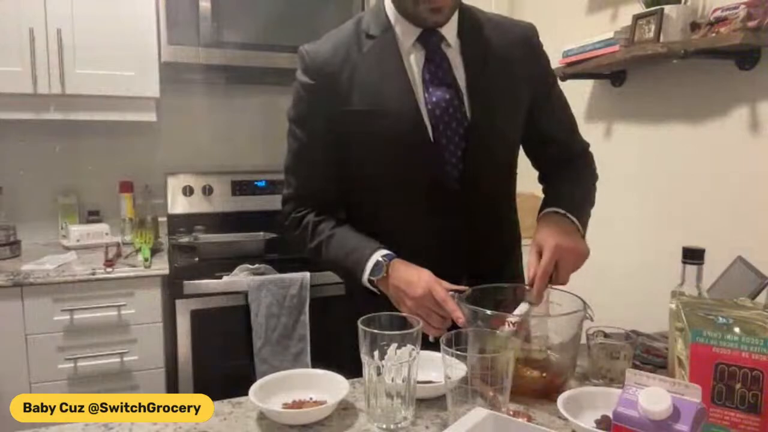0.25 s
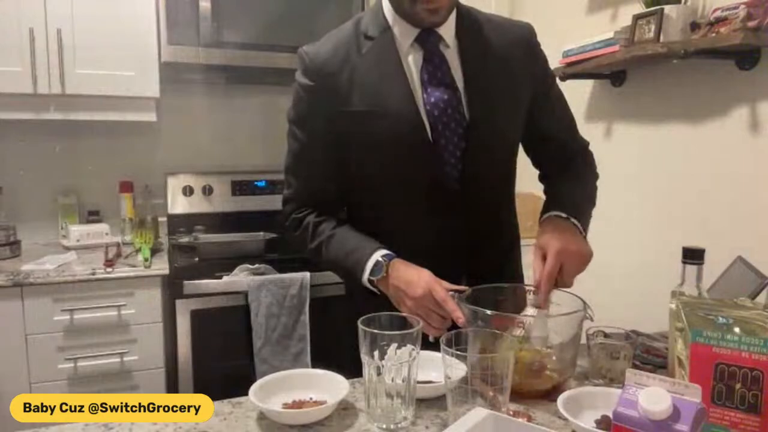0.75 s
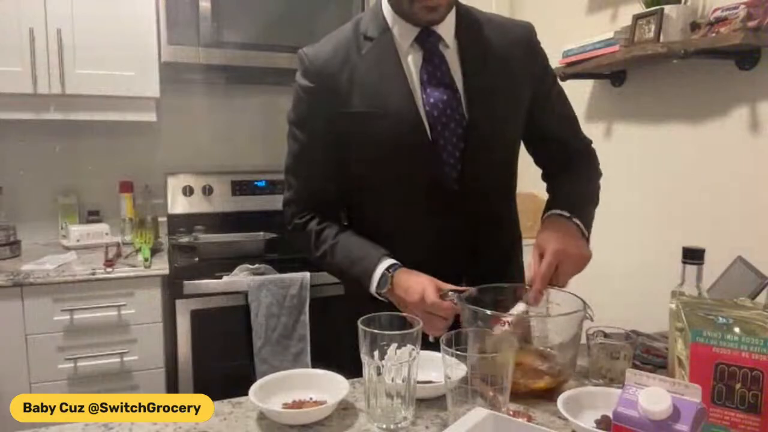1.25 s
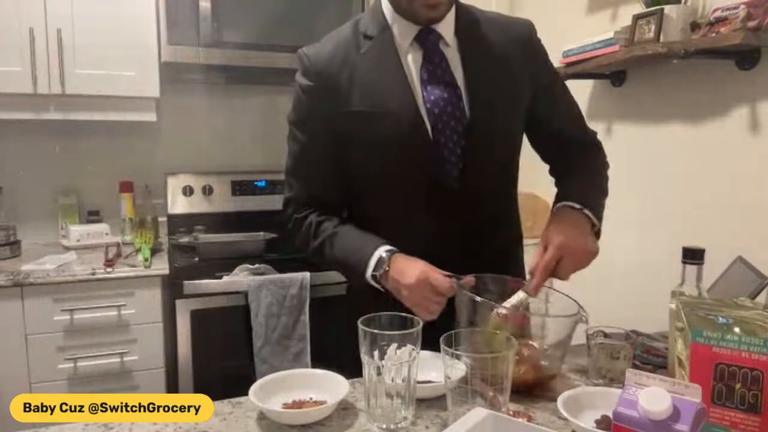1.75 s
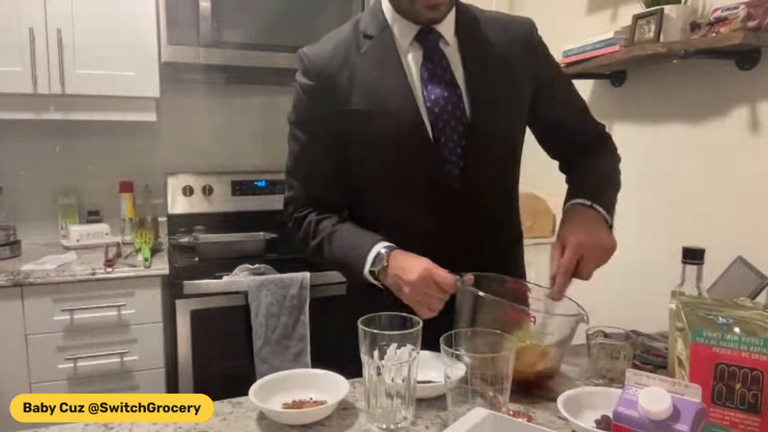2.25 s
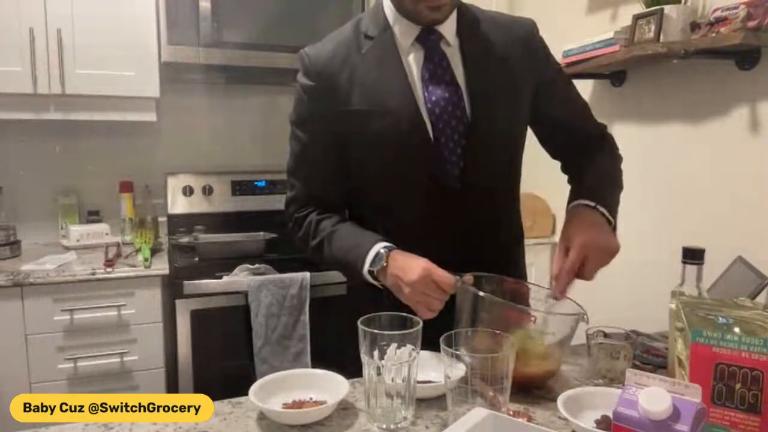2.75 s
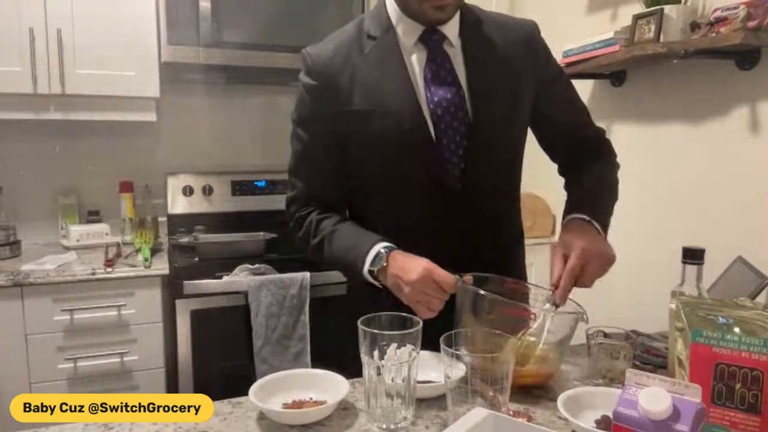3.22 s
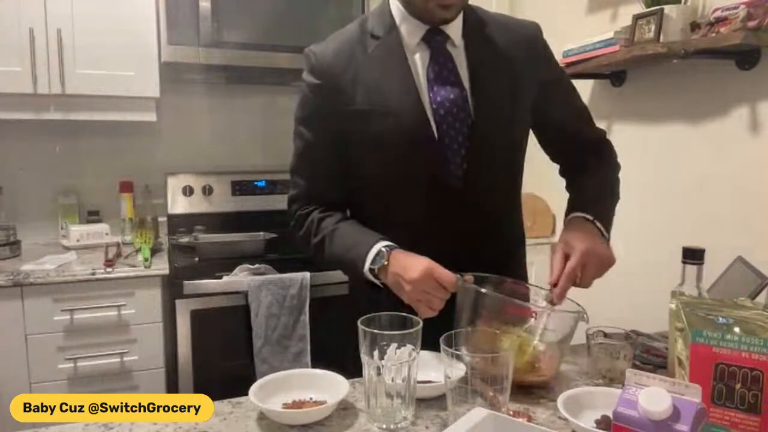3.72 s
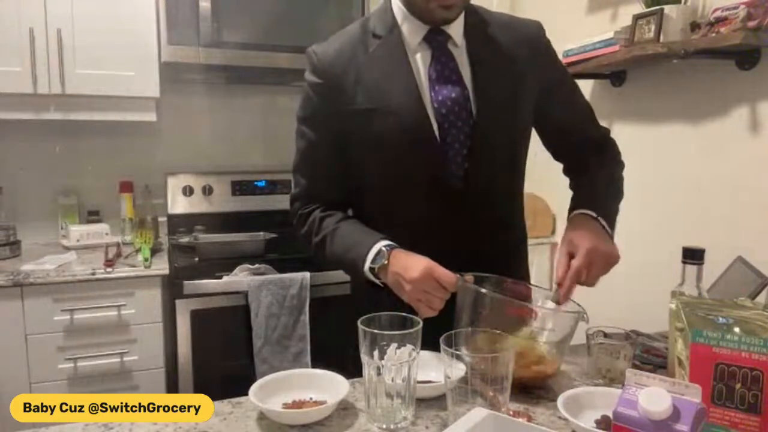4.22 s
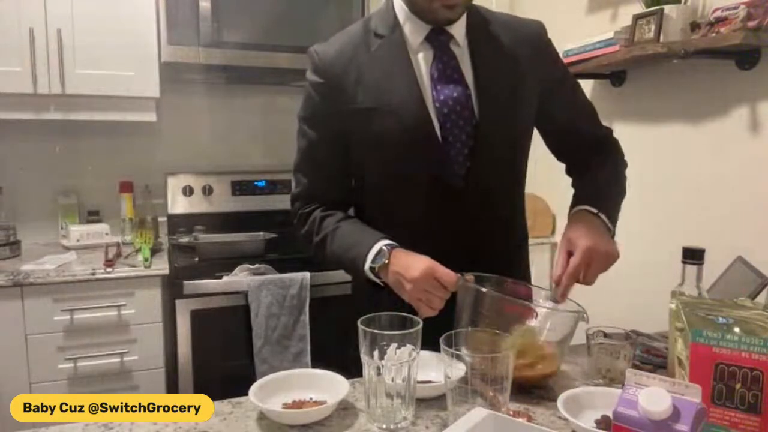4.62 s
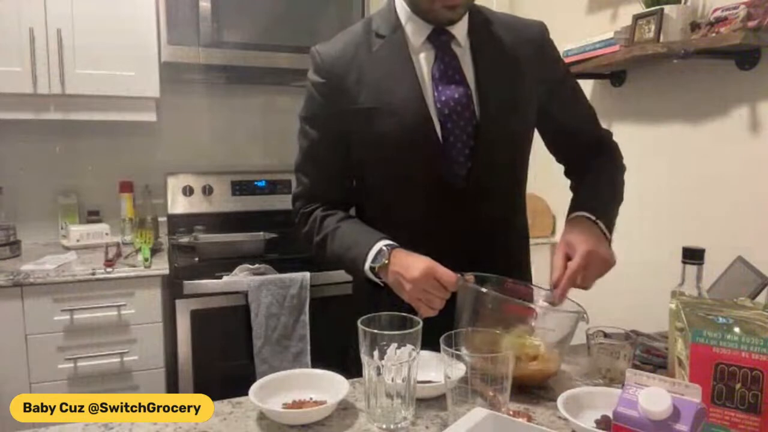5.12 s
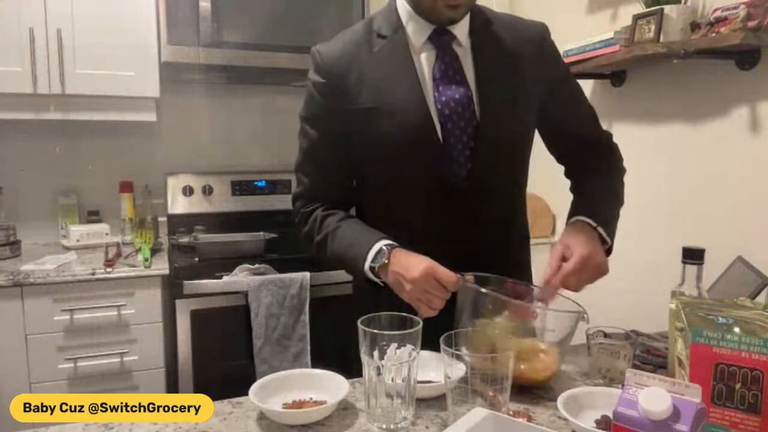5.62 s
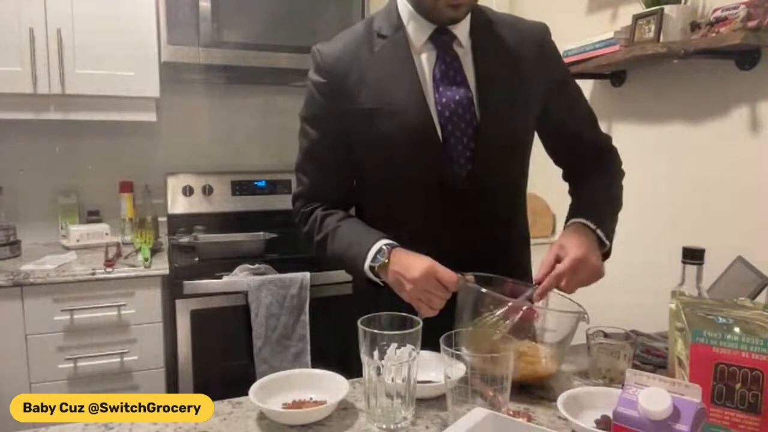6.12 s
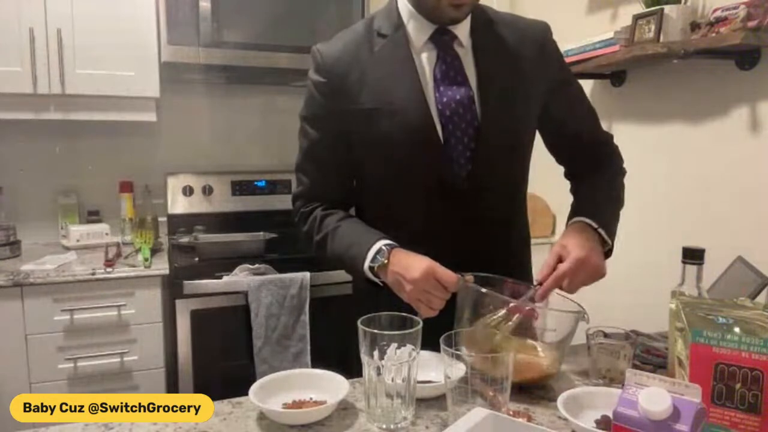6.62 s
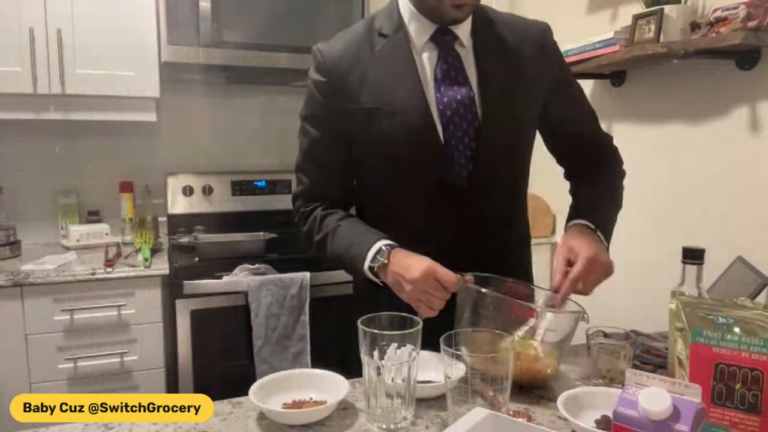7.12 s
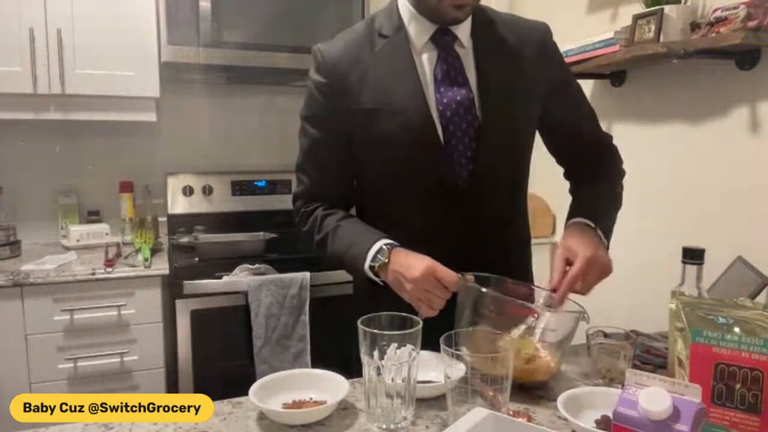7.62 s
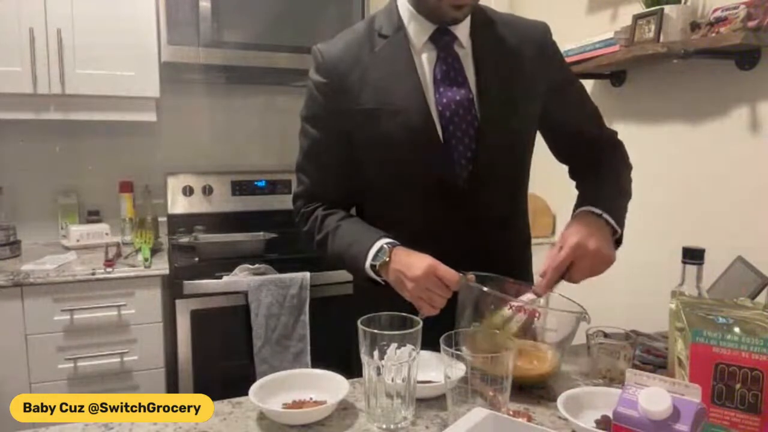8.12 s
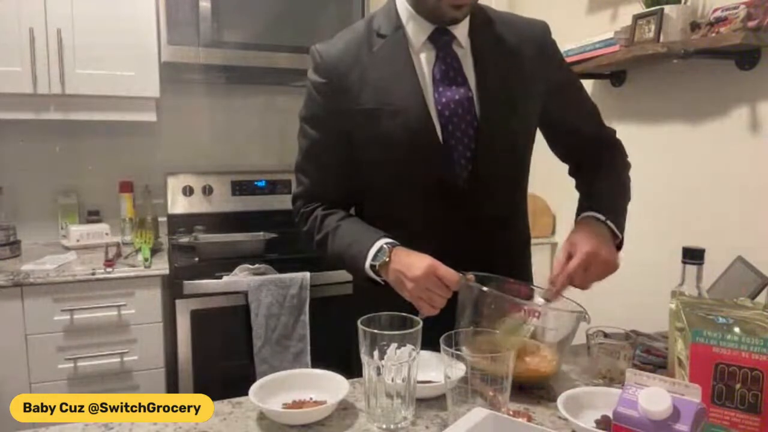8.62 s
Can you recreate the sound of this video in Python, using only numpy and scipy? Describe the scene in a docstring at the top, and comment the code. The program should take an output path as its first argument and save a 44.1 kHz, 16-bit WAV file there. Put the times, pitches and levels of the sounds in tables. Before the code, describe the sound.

A wire whisk beats thin batter in a glass bowl on a kitchen counter, heard very close, with a short hard-room echo and faint steady hiss. Soft squelches begin at once, about six a second, made of crackly slosh, fine fizz and tiny ringing bubbles; a sharper splashy stroke comes at 0.75. Strokes grow stronger from 1.5 to 2.3, with a hollow knock at 1.7 and a clack with wire twang at 1.85. The loudest knock, hollow and glassy, lands at 2.65. Softer stirring follows, a dull knock at 3.5 and a clearer one at 4.35, after which the pace slows slightly. Air pockets plop with rising pitch throughout, and brief airy whistles squeeze out near 5.35 and 6.5. Bright strokes hit around 6.3 to 6.5 with a twang. Thudding knocks at 7.55 and a glassy one at 8.65 precede the end near 8.9, still whisking.

```python
"""Soft wet squelches come first, over faint hiss: a wire whisk in thin batter, five or six strokes a second.
The listening point is close to a glass bowl on a counter in a small hard kitchen, which answers with a short echo.
Strokes are bursts of clicks and small ringing bubbles; trapped air plops as decaying tones of rising pitch.
Air whistles as resonant noise; now and then the whisk knocks the bowl: a hollow note, damped glass modes,
a wire clack and a counter thud, and single wires twang as beating tones."""
import sys
import numpy as np
from scipy import signal
from scipy.fft import rfft, irfft, next_fast_len
from scipy.io import wavfile
from scipy.ndimage import map_coordinates

SR = 44100
rng = np.random.default_rng(int(sys.argv[2]) if len(sys.argv) > 2 else 0)


def bounce(signal):
    """Save signal as a 16-bit WAV file at the path given by the first command-line argument."""
    frames = np.transpose(np.atleast_2d(signal))
    limited = np.clip(frames, -1, 1)
    pcm = np.round(limited * 32767).astype(np.int16)
    wavfile.write(sys.argv[1], SR, pcm)


N = 390726


def amp(db):
    """Decibels to gain."""
    return 10 ** (np.asarray(db) / 20)


def unit(x):
    """x at rms 1."""
    return x / np.sqrt(np.mean(x ** 2) + 1e-20)


def along(points, hz):
    """(Hz, value) points read on a log frequency axis."""
    f, v = np.transpose(points)
    return np.interp(np.log(hz + 1), np.log(f), v)


def filtered(x, response):
    """x times a response of frequency."""
    m = next_fast_len(len(x) + 4096)
    return irfft(rfft(x, m) * response(np.fft.rfftfreq(m, 1 / SR)), m)[:len(x)]


def coloured(x, spectrum):
    """x given a spectrum, at rms 1."""
    return unit(filtered(x, lambda hz: amp(along(spectrum, hz))))


def add(track, s, sound):
    """Mix a sound into the track from second s on."""
    i = max(round(s * SR), 0)
    track[i:i + len(sound)] += sound[:len(track[i:])]


def fade(t, t60):
    """Gain of a decay that loses 60 dB in t60 seconds."""
    return np.exp(-np.log(1000) * t / np.maximum(t60, 1e-4))


def crackle(size, rate, spread_db):
    """Tiny films bursting: about rate clicks a second, of uneven strength and either sign, at rms 1."""
    present = rng.random(size) < rate / SR
    sign = rng.choice([-1, 1], size)
    strength = amp(spread_db * np.clip(rng.standard_normal(size), -2, 2))
    return unit(present * sign * strength)


def bubble(t, hz, t60, glide, onset_cycles):
    """A ringing air pocket: a decaying sine whose pitch climbs (glide > 0) as it nears the surface."""
    pitch = hz * (1 + glide * (np.minimum(t / t60, 1) - 1 / 4))
    tone = np.sin(2 * np.pi * np.cumsum(pitch, axis=-1) / SR)
    onset = 1 - np.exp(-(t * hz / onset_cycles) ** 2)
    return tone * fade(t, t60) * onset


def froth(size, when, hz, gain, cycles):
    """Many small bubbles, each a damped sine that loses 60 dB in some cycles, at rms 1."""
    k = np.arange(SR // 70)
    t, hz = k / SR, np.minimum(hz, SR / 3)[:, None]
    onset = 1 - np.exp(-t * hz / 2)
    pops = gain[:, None] * np.sin(2 * np.pi * hz * t) * fade(t, cycles / hz) * onset
    at = (when * SR).astype(int)[:, None] + k
    return unit(np.bincount(at.ravel(), pops.ravel(), size)[:size])


def gurgling(x, depth_db):
    """The hollows between wires and batter keep changing shape, so resonances come and go."""
    z = signal.stft(x, nperseg=256)[2]
    row, column = np.indices(z.shape)
    place = [7 * np.log1p(row / 7), column / 5]  # broader patches toward the treble
    field = map_coordinates(rng.standard_normal((32, z.shape[1] // 5 + 2)), place, order=1)
    gain = amp(depth_db * np.clip(field, -1.5, 1.5))
    return unit(signal.istft(z * gain, nperseg=256)[1][:len(x)])


def ring(t, modes):
    """A struck object's modes as decaying sines, neighbours swinging in opposite directions."""
    return sum((-1) ** k * amp(db) * np.sin(2 * np.pi * hz * t) * fade(t, t60)
               for k, (hz, db, t60) in enumerate(modes))


# colour of the room's steady air: f/Hz, relative level/dB
AIR_COLOUR = [(20, -12), (50, -14), (85, -0.5), (130, 6), (200, 4), (400, -2), (800, -14.5), (2000, -12.5),
              (6000, -23.5), (11500, -28), (12500, -39), (16000, -41)]


def room_air():
    """The steady faint hiss of the room: coloured noise."""
    return amp(-60) * coloured(rng.standard_normal(N), AIR_COLOUR)


# how long the small hard kitchen rings: f/Hz, t60/s
KITCHEN_DECAY = [(100, 0.23), (300, 0.73), (700, 0.23), (2000, 0.36), (5000, 0.19), (9000, 0.27),
                 (15000, 0.43)]


def kitchen(x, count=24):
    """Counter, wall and cupboards answer as decaying noise; the pattern changes as the bowl moves."""
    out, t = np.zeros(N), np.arange(SR // 2) / SR
    nearby = 1 + 1.1 * np.exp(-((t - .02) / .022) ** 2)  # the first reflections are the strongest
    for part in np.array_split(np.arange(N), count):
        hz, when, z = signal.stft(rng.standard_normal(len(t)), SR, nperseg=256)
        decay = fade(when, along(KITCHEN_DECAY, hz)[:, None])
        tail = signal.istft(z * decay, SR, nperseg=256)[1][:len(t)]
        tail = tail * nearby * (1 - np.exp(-(t / 0.00093) ** 2))
        add(out, part[0] / SR, signal.fftconvolve(x[part], tail / np.linalg.norm(tail)))
    return out


# how hard the batter is stirred: t/s, relative level/dB
STIRRING = [(0, -59), (.3, -66.5), (.6, -57.5), (2.8, -52), (3.8, -57), (4.9, -54), (7.5, -55),
            (8.86, -57.5)]


def effort_db(s):
    """Relative level of the stirring at second s, which moves slosh, light strokes and wake pockets."""
    return np.interp(s, *np.transpose(STIRRING))


# the arm slows halfway: t/s, stroke rate/Hz
STROKE_PACE = [(0, 6), (4.25, 6), (4.45, 5.52), (8.86, 5.52)]
FIRST_STROKE_TURNS = .64


def beats():
    """The moments at which the whisk dips in, once every turn of the wrist."""
    now = np.arange(N) / SR
    turns = np.cumsum(np.interp(now, *np.transpose(STROKE_PACE))) / SR
    return np.interp(np.arange(FIRST_STROKE_TURNS, turns[-1]), turns, now)


# strokes that break the surface and stand out:
# t/s, spray relative level/dB, slap relative level/dB, central bubble f/Hz, length scale/s
STRONG_STROKES = [(0.088, -38.5, -54, 2190, 0.027), (0.226, -40, -42.5, 6630, 0.014),
                  (0.482, -27.5, -40, 4450, 0.014), (0.612, -33, -38, 4820, 0.014),
                  (0.7637, -21, -40, 4200, 0.0058), (.809, -36.5, -34, 6150, .006),
                  (0.967, -40, -37.5, 3320, 0.024), (1.109, -35.5, -36, 2160, 0.017),
                  (1.14, -33.5, -38, 2930, 0.018), (1.48, -28.5, -29, 6400, 0.0055),
                  (1.806, -23, -29.5, 4340, 0.013), (1.953, -29, -30.5, 6160, 0.016),
                  (2.11, -31, -25.5, 2360, .026), (2.274, -24, -22.5, 4860, 0.004),
                  (2.936, -38.5, -51, 4330, 0.051), (3.105, -37, -39.5, 4440, 0.021),
                  (3.45, -44, -44, 11050, 0.028), (3.647, -20.5, -32, 6800, 0.011),
                  (3.944, -34, -40, 4140, 0.0048), (4.279, -40.5, -42, 2380, 0.024),
                  (4.667, -35.5, -67, 4710, 0.025), (4.833, -38.5, -42, 3500, 0.027),
                  (5.024, -37.5, -36.5, 3810, 0.022), (5.379, -25, -33, 4100, 0.0044),
                  (5.749, -38, -30.5, 3380, .01), (5.941, -33.5, -35, 2540, 0.0059),
                  (6.11, -38, -25.5, 3870, 0.01), (6.227, -32.5, -48, 2065, .007),
                  (6.3, -20, -27, 8330, 0.0095), (6.48, -24, -30.5, 2200, 0.0096),
                  (7.172, -31, -38, 6110, 0.015), (7.347, -38, -37, 5120, .03),
                  (7.694, -33, -48, 4320, .012), (8.071, -34.5, -45.5, 2840, 0.0073),
                  (8.446, -21.5, -27.5, 6670, .004), (8.639, -42, -25, 3500, 0.0081),
                  (8.807, -34, -31, 8730, 0.013)]
LIGHT_DB, LIGHT_HZ, LIGHT_S = 5.5, 3713, 0.034  # an ordinary stroke: spray re effort, bubble pitch, length
LIGHT_SCATTER_DB, LIGHT_SCATTER_OCT = 1, 0.37  # standard deviations of its level and pitch
LIGHT_SLAP_DB = 1.5  # slap of an ordinary stroke over its spray


def all_strokes():
    """Every beat is a light squelch that follows the effort, unless a strong one takes its place."""
    times, strong = beats(), np.transpose(STRONG_STROKES)[0]
    force, size = rng.standard_normal((len(times), 2)).T
    levels = effort_db(times) + LIGHT_DB + LIGHT_SCATTER_DB * force
    pitches = LIGHT_HZ * 2 ** (LIGHT_SCATTER_OCT * size)
    light = [(s, db, db + LIGHT_SLAP_DB, hz, LIGHT_S) for s, db, hz in zip(times, levels, pitches)]
    return STRONG_STROKES + [row for row in light if np.abs(strong - row[0]).min() > .06]


# colour of the moving batter: f/Hz, relative level/dB
SLOSH_COLOUR = [(250, -27.5), (650, 13.5), (950, -0.5), (1300, 9), (1800, -2), (2600, 0.5), (4200, 4.5),
                (6000, -6), (10000, -23)]
# colour of its fine fizz: f/Hz, relative level/dB
FIZZ_COLOUR = [(1500, -18.5), (3500, -7.5), (5500, 7.5), (8000, 6), (11300, 0.5), (12500, -17),
               (16000, -26)]


def swirl(strokes, count=1500):
    """After each stroke the batter sloshes and fizzes, then settles; stray bubbles pop in it."""
    now = np.arange(N) / SR
    starts = np.sort(np.transpose(strokes)[0])
    since = np.abs(now - starts[np.searchsorted(starts, now) - 1])
    stirred = amp(-4) + np.exp(-since / 0.018) * (1 - np.exp(-since / 0.021))
    lumps = amp(3.5 * map_coordinates(rng.standard_normal(N // 1200), [np.arange(N) / 1400], order=1))
    when, size, strength = rng.random((count, 3)).T
    hz = 900 * 7 ** (size ** 1.326)
    pops = froth(N, when * N / SR, hz, amp(-22 * np.sqrt(strength)), cycles=50)
    slosh = coloured(gurgling(crackle(N, rate=2000, spread_db=4), depth_db=8), SLOSH_COLOUR)
    fizz = coloured(gurgling(crackle(N, rate=4000, spread_db=4), depth_db=6), FIZZ_COLOUR)
    batter = amp(-2.5) * slosh + amp(-10) * pops + amp(-7) * stirred * fizz
    return amp(effort_db(now)) * stirred * lumps * batter


# batter sucked through the wires with a whistling edge:
# t/s, relative level/dB, f/Hz, length scale/s
WHISTLING_GAPS = [(0, -48, 2690, 0.056), (0.089, -35.5, 10540, 0.0095), (0.453, -48.5, 2190, .06),
                  (0.932, -50.5, 5760, 0.023), (4.596, -32.5, 7360, 0.0067), (5.264, -43, 2600, 0.013),
                  (5.348, -27.5, 4090, .007), (6.48, -28.5, 1163, 0.015), (7.698, -41, 9200, 0.016),
                  (8.266, -34, 6000, 0.012)]


def slurps():
    """Air drawn through a narrow gap in the batter sings roughly around one pitch: resonant noise."""
    out, t = np.zeros(N), np.arange(SR // 4) / SR
    for s, db, hz, length in WHISTLING_GAPS:
        def gap(f):
            """Two equal resonances in a row, of quality 7."""
            return (1 + 1j * 7 * (f / hz - hz / (f + 1))) ** -2

        swell = (1 - np.exp(-t / 0.00022)) * np.exp(-(t / length) ** 2)
        song = unit(swell * filtered(rng.standard_normal(len(t)), gap))
        add(out, s, amp(db) * np.sqrt(np.mean(swell ** 2)) * song)
    return out


WAKE_S, WAKE_DB, WAKE_HZ = .09, -1.5, 1198  # pocket behind a stroke: mean delay, level re effort, pitch
WAKE_SCATTER_S, WAKE_SCATTER_DB, WAKE_SCATTER_OCT = 0.022, 1, 0.367  # their standard deviations


def wake_pockets():
    """The batter closes behind every stroke and traps a small pocket of air."""
    times = beats()
    pockets = []
    for s, (late, force, size) in zip(times, rng.standard_normal((len(times), 3))):
        when = s + WAKE_S + WAKE_SCATTER_S * late
        level_db = effort_db(s) + WAKE_DB + WAKE_SCATTER_DB * force
        pockets.append((when, level_db, WAKE_HZ * 2 ** (WAKE_SCATTER_OCT * size)))
    return pockets


# large pockets of air closing in the batter: t/s, relative level/dB, f/Hz
AIR_POCKETS = [(0.437, -51, 1405), (0.827, -48.5, 1330), (1.268, -36, 722), (1.32, -39, 677),
               (1.97, -41.5, 1002), (2.275, -34, 608), (2.428, -46, 710), (2.606, -42.5, 680),
               (3.279, -44.5, 1430), (3.986, -40.5, 707), (4.066, -51.5, 1182), (4.293, -45.5, 717),
               (4.456, -33, 666), (4.504, -45, 710), (4.805, -43.5, 672), (4.873, -51, 1600),
               (4.997, -40.5, 913), (5.371, -34.5, 705), (5.944, -48, 742), (6.046, -46, 1224),
               (6.114, -44, 682), (6.36, -43, 738), (6.483, -32, 722), (6.782, -47, 624),
               (6.827, -34.5, 698), (7.366, -43, 700), (8.838, -32, 754)]


def plops(count=6):
    """Air pockets gulp on a rising tone, each with a short wet gurgle of lesser bubbles."""
    out, t = np.zeros(N), np.arange(SR // 8) / SR
    for s, db, hz in AIR_POCKETS + wake_pockets():
        add(out, s - .002, amp(db + 15.5) * bubble(t, hz, 0.053, glide=0.15, onset_cycles=1.86))
        colour = [(hz / 2, -25), (hz, 0), (hz * 2, -5), (hz * 4, -20), (SR / 2, -60)]
        gurgle = coloured(rng.standard_normal(len(t)), colour)
        add(out, s - .006, amp(db) * gurgle * fade(t, 0.1) * (1 - np.exp(-t / 0.013)))
        when, size = rng.random((2, count))
        lesser = froth(len(t), .06 * when, hz * (1 + 0.99 * size), 1.2 - when, cycles=11)
        add(out, s - .012, amp(db - 25) * lesser)
    return out


# whisk wires springing off the glass: t/s, relative level/dB, f/Hz
WIRE_TWANGS = [(1.84, -28.5, 2246), (1.838, -33, 1400), (1.842, -33, 3970), (2.941, -38, 4210),
               (2.977, -44.5, 2600), (6.484, -28.5, 2142), (7.615, -38.5, 3860), (7.698, -43, 4153)]


def twangs():
    """Neighbouring wire loops are nearly alike, so each twang beats as it dies."""
    out, t = np.zeros(N), np.arange(SR // 3) / SR
    for s, db, hz in WIRE_TWANGS:
        loops = ring(t, [(hz, 0, .13), (hz * 1.025, -6, .09), (hz * .97, -8, .07)])
        add(out, s, amp(db) * loops * (1 - np.exp(-t / 0.00024)))
    return out


# the glass, damped by batter and hand: f/Hz, relative level/dB, t60/s
GLASS_MODES = [(1222, -2, .04), (1300, -5.5, 0.044), (1440, -15, 0.025), (1525, -13, 0.066),
               (1666, -7, 0.052), (1843, -12, 0.061), (1990, -29.5, 0.05), (2060, -28.5, 0.045),
               (2500, -9, 0.081), (2760, -12, 0.13), (2826, -11, 0.067), (3670, 1, 0.014),
               (4260, -12.5, 0.0375), (4305, 0, 0.039), (5800, -8, 0.028), (6370, -13, 0.054),
               (5930, -2, 0.029), (7060, -11.5, 0.093), (8390, -8.5, 0.034)]
GLASS_SPLIT, TWIN_DB = 0.027, -2  # relative pitch spread of each mode's twin, its level re the mode


def glass_modes():
    """The handle and the uneven wall split every mode of the glass in two."""
    twins = [(hz * np.exp(GLASS_SPLIT * rng.standard_normal()), db + TWIN_DB, t60)
             for hz, db, t60 in GLASS_MODES]
    return GLASS_MODES + twins


# the counter under the bowl: f/Hz, relative level/dB, t60/s
COUNTER_MODES = [(94, -9, .07), (112.7, -22, 1), (150.5, 8, 0.058), (202, -3, 0.12), (286, 2.5, 0.085),
                 (364, -7.5, 0.076)]
# colour of wires clacking on glass: f/Hz, relative level/dB
CLACK_COLOUR = [(150, -43.5), (330, 0), (600, 4.5), (1400, 2.5), (2400, -9), (3200, -16.5), (4100, -3.5),
                (7000, -13.5), (12000, -3.5), (16000, -13)]
# whisk against the bowl: t/s, hollow note relative level/dB, note f/Hz, glass relative level/dB,
# clack relative level/dB, contact hardness as a low-pass f/Hz, counter thud relative level/dB
BOWL_KNOCKS = [(1.680, -15.5, 523, -25.5, -50, 920, -38.5), (1.839, -25, 469, -30, -11.5, 2490, -64),
               (2.661, -6.5, 616, -8, -8, 4230, -34.5), (3.506, -20, 610, -46, -48, 492, -30),
               (4.192, -51, 614, -60, -53, 600, -47.5), (4.339, -11.5, 639, -32, -18, 1080, -31),
               (7.562, -13.5, 614, -24, -14, 620, -22), (8.670, -12, 626, -17.5, -12.5, 1590, -37)]
RATTLE_DB, RATTLE_T60_S = -17.5, 0.5  # wires skipping on the glass: start level re the blow, decay


def knocks():
    """The bowl gives a short hollow note; only hard contacts reach the high modes of the glass."""
    out, t = np.zeros(N), np.arange(SR * 3 // 4) / SR
    bowl, counter = amp(-1) * ring(t, glass_modes()), ring(t, COUNTER_MODES)
    for s, note_db, note_hz, glass_db, clack_db, hard_hz, thud_db in BOWL_KNOCKS:
        note = bubble(t, note_hz, 0.02, glide=-0.063, onset_cycles=3.45)
        add(out, s, amp(note_db) * note / np.abs(note).max())
        squeezed = bubble(t, note_hz * 1.087, 0.038, glide=0, onset_cycles=3.3)
        add(out, s - .008, amp(note_db - 9.5) * squeezed)  # batter squeezed out first
        rattle_on = fade(t, 0.028) + amp(-20.5) * fade(t, 0.14)
        clack = coloured(rng.standard_normal(len(t)), CLACK_COLOUR) * rattle_on
        chatter = np.zeros(SR // 6)  # the wires skip on the glass after the first blow
        skips = rng.integers(SR // 100, len(chatter), size=24)
        chatter[skips] = amp(RATTLE_DB) * rng.standard_normal(size=24)
        chatter[0] = 1
        blows = chatter * fade(t[:len(chatter)], RATTLE_T60_S)
        glass = signal.fftconvolve(bowl, blows)[:len(t)]
        cushion = signal.butter(2, min(hard_hz, SR / 3), fs=SR)  # batter between wire and glass
        contact = signal.lfilter(*cushion, amp(glass_db) * glass + amp(clack_db) * clack)
        add(out, s + 0.00065, contact * (1 - np.exp(-t * hard_hz / 3)))
        thud = amp(thud_db) * counter * (1 - np.exp(-t / 0.003))
        add(out, s + 0.0027, thud)
        for lag, db in [(.036, -23.5), (.078, -18.5)]:  # the bowl rocks back onto its foot
            add(out, s + lag + rng.uniform(0, 0.0058), amp(db) * thud)
    return out


# colour of the fine spray: f/Hz, relative level/dB
SPRAY_COLOUR = [(1500, -32), (3500, -10.5), (5500, 9), (8000, 6), (11300, 4.5), (12500, -6), (16000, -14)]
# colour of the slap on the surface: f/Hz, relative level/dB
SLAP_COLOUR = [(300, -16), (700, -5.5), (1300, -2), (2300, -4), (3100, 1.5), (4000, 6.5), (5200, -11.5),
               (9000, -38)]
BUBBLES_DB = 2  # bubbles of any stroke over its spray


def squelches(strokes, count=22):
    """Each stroke hisses into the batter and rips it: a slap, a fine spray and a cluster of small bubbles."""
    lead = .03  # seconds heard before the stroke
    out, t = np.zeros(N), np.arange(SR // 5) / SR - lead
    for s, spray_db, slap_db, hz, length in strokes:
        spray = coloured(gurgling(crackle(len(t), rate=3000, spread_db=5), depth_db=7), SPRAY_COLOUR)
        slap = coloured(gurgling(crackle(len(t), rate=2000, spread_db=5), depth_db=7), SLAP_COLOUR)
        since = t - .004  # the tear is widest a moment after it opens
        closing = -(np.abs(since) / (1.44 * length)) ** 2.36
        tear = np.exp(np.where(since < 0, since / 0.0029, closing))
        drag = amp(-15) * np.exp(np.where(since < 0, since / .005, -(since / .032) ** 2))
        wires = amp(4.2 * np.interp(t, np.linspace(t[0], t[-1], 56), rng.standard_normal(56)))
        stroke = (tear + drag) * wires  # one wire after another breaks through
        order = np.linspace(0, 1, count) ** 2
        when = length * (0.26 + 3 * order * rng.uniform(0.64, 1.5, count))
        scatter = 0.026 + .1 * when / length  # the first bubbles are alike, the later ones of any size
        sizes = amp(11 * rng.standard_normal(count)) * np.exp(-.55 * when / length)
        pitches = hz * np.exp(scatter * rng.standard_normal(count))
        bubbles = froth(len(t), lead + when, pitches, sizes, cycles=90)
        burst = amp(spray_db) * (unit(stroke * spray) + amp(BUBBLES_DB) * bubbles)
        burst += amp(slap_db) * unit(stroke * slap)
        add(out, s - lead, amp(-11) * np.sqrt(np.mean(tear ** 2)) * burst)
    return out


def scene():
    """The bowl close by, its echo, and the steady air of the room."""
    strokes = all_strokes()
    wet = squelches(strokes) + slurps() + swirl(strokes)
    gulps = plops()
    blows = knocks() + twangs()
    upward = amp(-3.5) * wet  # the open bowl throws the wet sounds up into the room
    echo = kitchen(upward + amp(-14.5) * gulps + amp(-6.5) * blows)
    return (wet + gulps + blows + echo + room_air())[None]


TOP_HZ = 15800


def record(dry):
    """Everything from TOP_HZ up is removed; the sound has no treble beyond 15.8 kHz."""
    return np.array([filtered(channel, lambda hz: hz < TOP_HZ) for channel in dry])


dry = scene()
out = record(dry)
bounce(out)
```